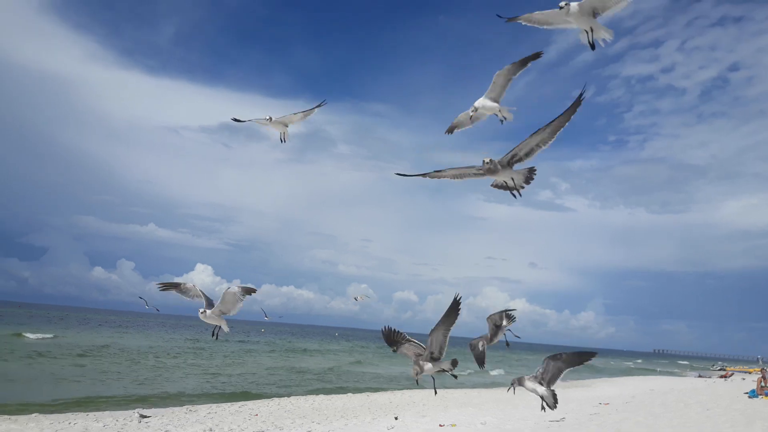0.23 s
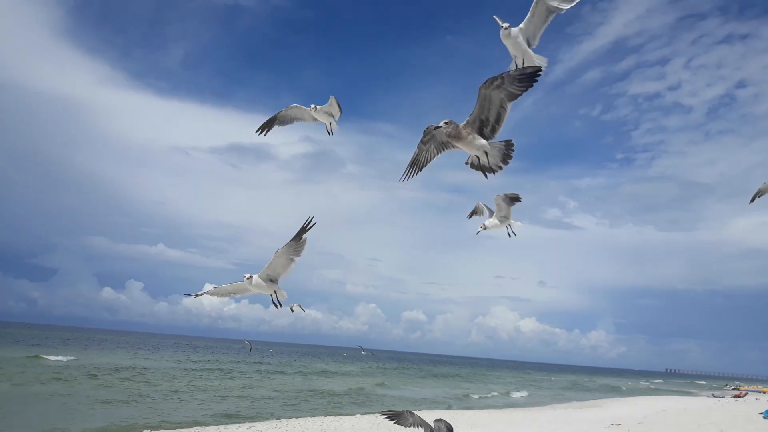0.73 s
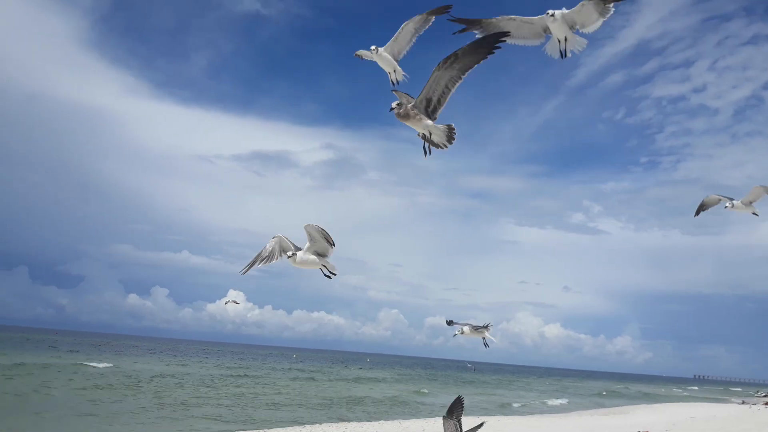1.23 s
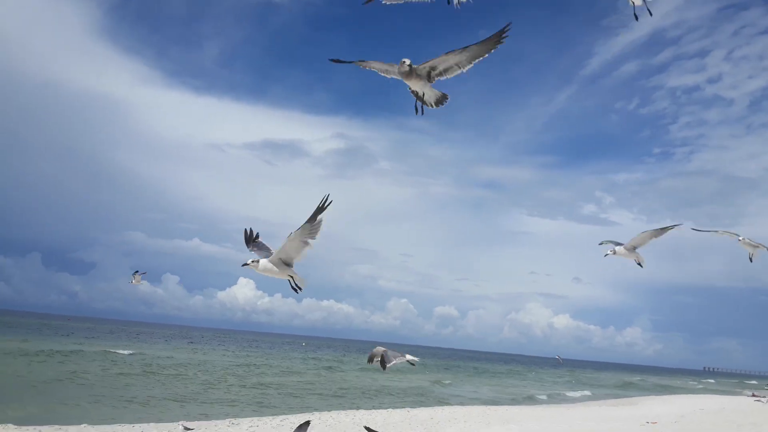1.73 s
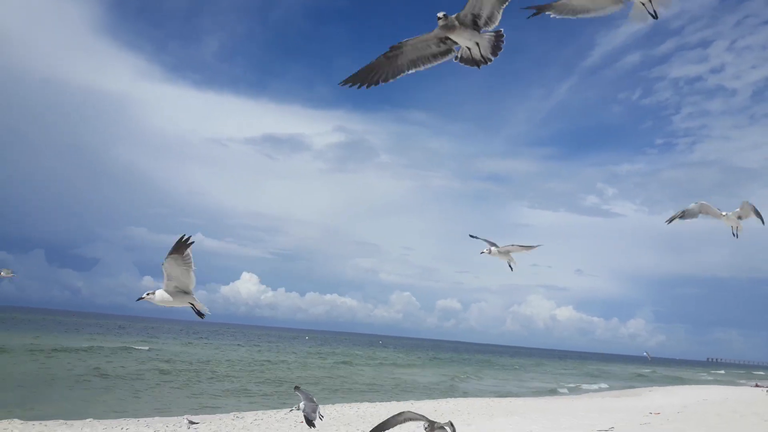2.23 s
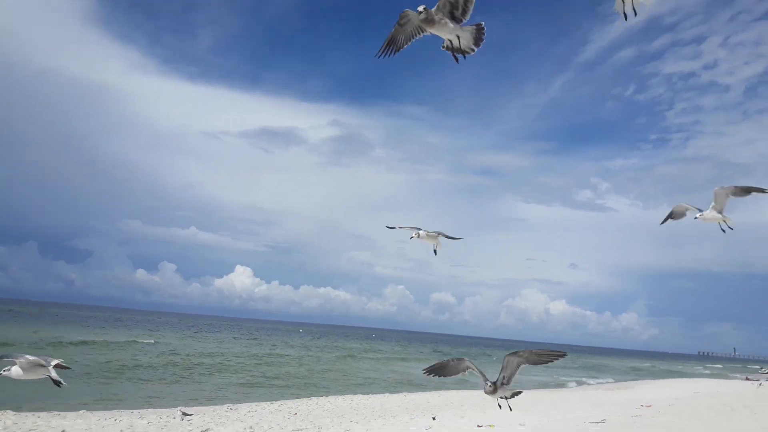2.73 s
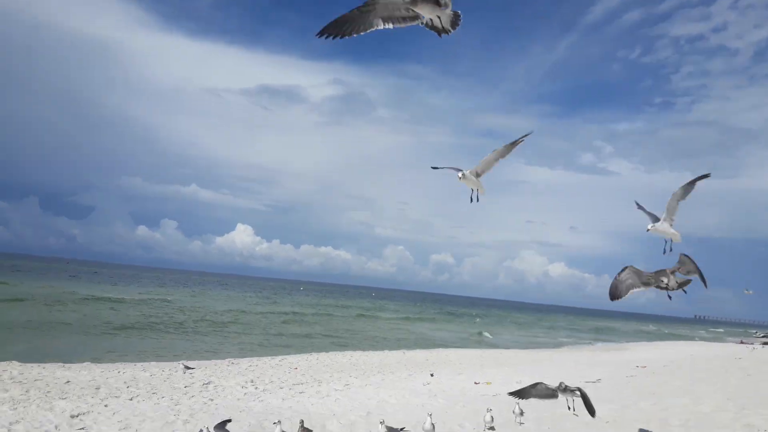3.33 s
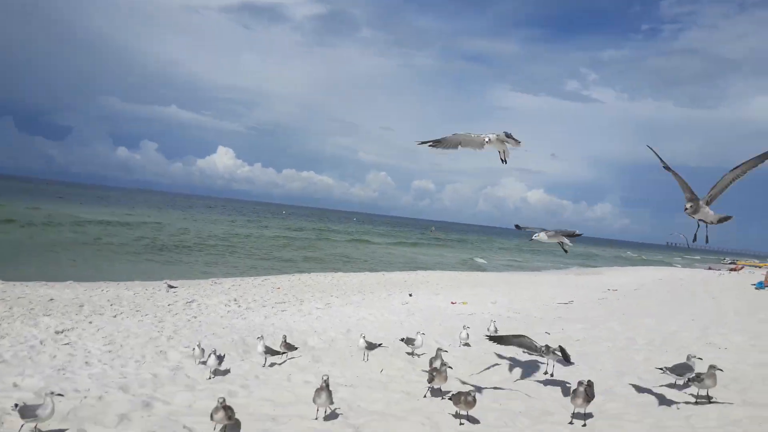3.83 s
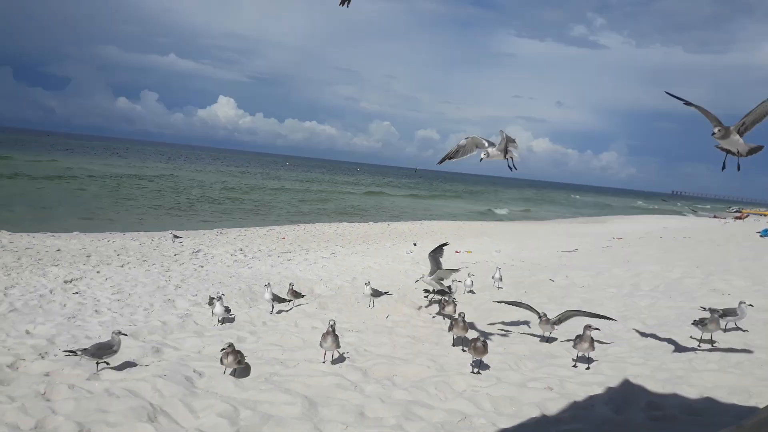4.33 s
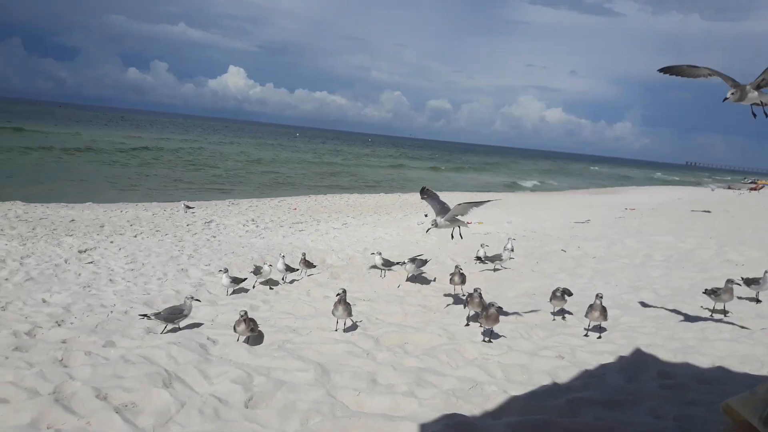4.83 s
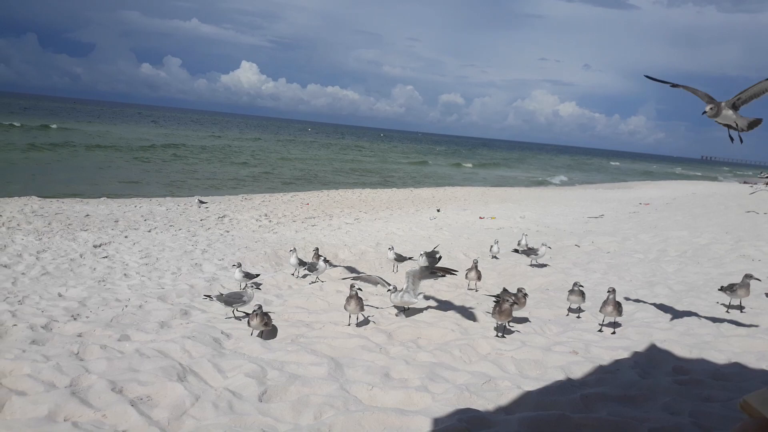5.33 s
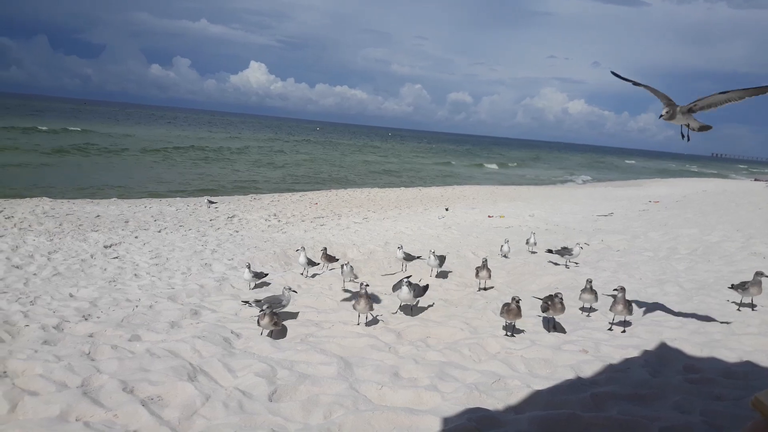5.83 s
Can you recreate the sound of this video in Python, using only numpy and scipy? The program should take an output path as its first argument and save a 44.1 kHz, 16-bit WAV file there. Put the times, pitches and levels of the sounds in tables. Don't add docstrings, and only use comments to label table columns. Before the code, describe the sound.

Begging gull whistles and rasping squawks crowd together, thin out to a lull, then a scream, low chuckle and late cries above quiet surf.

```python
import sys
import numpy as np
from scipy import signal
from scipy.fft import rfft, irfft, next_fast_len
from scipy.io import wavfile
from scipy.ndimage import uniform_filter1d, map_coordinates

SR = 44100
rng = np.random.default_rng(int(sys.argv[2]) if len(sys.argv) > 2 else 0)


def transcribe(u):
    v = np.clip(np.atleast_2d(u).T, -1, 1)
    q = np.round(v * 32767).astype(np.int16)
    wavfile.write(sys.argv[1], SR, q)


def makeup_ratio(level_db):
    decades = np.asarray(level_db, float) / 20
    return 10 ** decades


N = 267554
TIME_S = np.arange(N) / SR
PORTS = np.array([[.5], [-.5]])


def unit(x):
    return x / np.sqrt(np.mean(x ** 2) + 1e-20)


def along(points, hz):
    f, v = np.transpose(points)
    return np.interp(np.log(hz + 1), np.log(f + 1), v)


def wobble(rate_hz, size=N):
    knots = rng.standard_normal(int(size * rate_hz / SR) + 4)
    return map_coordinates(knots, [np.arange(size) * rate_hz / SR])


def filtered(x, response):
    m = next_fast_len(x.shape[-1] + 2048)
    spectrum = rfft(x, m) * response(np.fft.rfftfreq(m, 1 / SR))
    return irfft(spectrum, m)[..., :x.shape[-1]]


def at_ports(x, pan_db, shading, lead_ms):
    def response(hz):
        level = makeup_ratio(PORTS * (pan_db + along(shading, hz)))
        return level * np.exp(2j * np.pi * hz * PORTS * lead_ms / 1000)
    return filtered(x, response)


def stretch(rows, fade_s):
    s, *cols = np.transpose(rows)
    t = np.arange(s[0], s[-1], 1 / SR)
    edge = np.clip(np.minimum(t - s[0], s[-1] - t) / fade_s, 0, 1)
    curves = [np.interp(t, s, c) for c in cols]
    return round(s[0] * SR), curves, np.sin(np.pi / 2 * edge) ** 2


# freq_hz, correlation
SURF_LIKENESS = [(250, 0.99), (650, 0.51), (1300, 0.95), (2200, 0.78), (3000, 0.05), (3900, 0.31),
                 (5200, 0.19), (6900, 0.15), (8000, 0.093)]
# freq_hz, left_right_db
SURF_SHADING = [(200, 0.3), (1300, -3), (2500, -1), (4400, -3.5), (8000, -3.5), (12000, 3.5)]


def surf_noise(spectrum, patchy_db):
    z = signal.stft(rng.standard_normal((2, N)), nperseg=512)[2]
    field = rng.standard_normal(z.shape[1:])
    field = uniform_filter1d(uniform_filter1d(field, 6, 0), 14, 1)
    pair = signal.istft(z * makeup_ratio(patchy_db * unit(field)), nperseg=512)[1][:, :N]

    def mid_side(hz):
        turn = np.arccos(np.clip(along(SURF_LIKENESS, hz), -1, 1)) / 2
        return makeup_ratio(along(spectrum, hz)) * [np.cos(turn), np.sin(turn)]
    mid, side = filtered(pair, mid_side)
    return unit(at_ports(np.array([mid + side, mid - side]), 0, SURF_SHADING, lead_ms=0.421))


# freq_hz, density_db
RUSH_SPECTRUM = [(100, -29), (220, 0.5), (500, -4), (1200, 0), (2100, 0), (2700, -7.5), (4000, -7),
                 (6200, -13), (7200, -10), (8700, -28), (10000, -28)]
# freq_hz, density_db
SPRAY_SPECTRUM = [(7000, -35), (9500, -8.5), (12200, 2.5), (14000, -1), (16000, -2)]
# freq_hz, density_db
RUMBLE_SPECTRUM = [(25, -34), (60, -3.5), (110, 4), (250, -2), (400, -29)]
# start_s, rumble_level_db
BREEZE_LEVEL = [(.08, -51), (1.1, -58.5), (1.5, -59.5), (2.55, -59.5), (2.7, -50.5), (3.5, -45), (4.5, -45),
                (5.2, -44), (6.07, -47)]


def surf():
    rumble_db = np.interp(TIME_S, *np.transpose(BREEZE_LEVEL))
    breeze_db, swell = rumble_db + 50, wobble(2.9)
    rush_db = -35 + 0.11 * breeze_db + 0.48 * swell + 0.46 * wobble(11)
    rumble_db = rumble_db + 1.0 + 0.13 * swell + 1.7 * wobble(7.9)
    spray_db = -52.5 - 0.027 * breeze_db + 0.23 * wobble(5.9)
    rush = makeup_ratio(rush_db) * surf_noise(RUSH_SPECTRUM, patchy_db=1.2)
    rumble = makeup_ratio(rumble_db) * surf_noise(RUMBLE_SPECTRUM, patchy_db=-0.5)
    return rush + rumble + makeup_ratio(spray_db) * surf_noise(SPRAY_SPECTRUM, patchy_db=3.5)


# start_s, level_db, left_right_db
GUST_CURVES = [
    [(0.08, -36, 10), (0.122, -28.5, 3), (.55, -31.5, 4.5), (0.968, -40.5, 8), (1.2, -50, 0)],
    [(2.6, -46, 7), (2.758, -43, 15), (3.45, -44, 3)],
]
# freq_hz, density_db
BUFFET_SPECTRUM = [(25, -39), (60, -3), (170, 1.5), (300, -8), (550, -21), (900, -29), (1500, -72)]
# centre_s, spread_s, level_db, left_right_db
EDDY_THUMPS = [(.145, 0.019, -20.5, 11), (.18, 0.0099, -31, -2), (0.253, 0.015, -23, 14.5),
               (.44, 0.04, -30.5, 10), (.505, 0.0058, -31, -5), (.538, 0.014, -33.5, -13),
               (2.752, 0.0044, -29.5, 11), (2.83, 0.011, -41, 7), (2.93, 0.01, -33, 15.5),
               (2.976, 0.012, -35.5, 15), (3.01, 0.008, -33, 6), (3.111, 0.0068, -35, 8),
               (3.132, 0.0085, -36, 5), (3.165, 0.0069, -42, 19), (3.3, 0.013, -29.5, -13)]


def gusts():
    gain, thump = np.zeros((2, N)), np.zeros((2, N))
    for rows in GUST_CURVES:
        first, (level_db, pan_db), edge = stretch(rows, fade_s=0.0016)
        gain[:, first:first + len(edge)] = makeup_ratio(level_db - 4 + PORTS * pan_db) * edge
    for centre_s, spread_s, level_db, pan_db in EDDY_THUMPS:
        thump += makeup_ratio(level_db + PORTS * pan_db) * np.exp(-.5 * ((TIME_S - centre_s) / spread_s) ** 2)

    def colour(hz):
        return makeup_ratio(along(BUFFET_SPECTRUM, hz))
    lumps = makeup_ratio(3.0 * np.array([wobble(40.22), wobble(35)]))
    buffet = unit(filtered(lumps * rng.standard_normal((2, N)), colour))
    eddy = filtered(rng.standard_normal((2, N)), colour)
    even = eddy / np.sqrt(np.abs(uniform_filter1d(eddy ** 2, size=900, axis=1)) + 1e-9)
    return gain * buffet + thump * even


# start_s, peak_db
CLICK_TICKS = [(1.1144, -29), (2.222, -32), (4.2536, -36), (5.007, -27.5), (5.02, -29), (5.031, -31),
               (5.446, -25)]


def ticks():
    out, t = np.zeros((2, N)), np.arange(600) / SR
    puff = np.exp(-.5 * ((t - .003) / 0.0023) ** 2)
    for start_s, peak_db in CLICK_TICKS:
        burst = puff * rng.standard_normal((2, len(t)))
        out[:, round(start_s * SR):][:, :len(t)] += makeup_ratio(peak_db + 3.5) * burst * makeup_ratio(PORTS * 5)
    colour_db = [(2000, -24), (6500, -0.5), (9000, -18.5), (12500, -3.5)]
    return filtered(out, lambda hz: makeup_ratio(along(colour_db, hz)))


SAND_SQUAWK_DB = -4
# freq_hz, left_right_db
VOICE_SHADING = [(1200, 0.5), (2100, 4.5), (3300, -0.8), (8000, 0), (9500, -2), (13000, 5)]


def add(out, first, x, pan_db, lead_ms, echo_db, swing=(0, 0)):
    before = 32
    x = at_ports(np.pad(x, (before, 600)), pan_db, VOICE_SHADING, lead_ms)
    i = np.arange(x.shape[1])
    delay_ms = 5 + 1.2 * rng.standard_normal((2, 1))
    drift_ms_per_s = 3.5 * rng.standard_normal((2, 1))
    late_ms = delay_ms + drift_ms_per_s * (i - i.mean()) / SR
    echo = np.array([map_coordinates(port, [i - ms * SR / 1000]) for port, ms in zip(x, late_ms)])
    x = (x + makeup_ratio(echo_db) * echo) / np.sqrt(1 + makeup_ratio(2 * echo_db))
    swing_db, swing_ms = swing
    way = np.linspace(-.5, .5, x.shape[1])
    left = makeup_ratio(swing_db * way) * map_coordinates(x[0], [i + swing_ms * way * SR / 1000])
    room = out[:, first - before:first - before + x.shape[1]]
    room += np.array([left, x[1]])[:, :room.shape[1]]


def note(start_s, length_s, first_hz, last_hz, level_db, slide):
    peak_s = start_s + 0.453 * length_s
    peak_hz = first_hz + slide * (last_hz - first_hz)
    return [(start_s, first_hz, level_db - 3), (peak_s, peak_hz, level_db),
            (start_s + length_s, last_hz, level_db - 3.5)]


def whistle(out, rows, pan_db, lead_ms, flutter_db, thinning, multiples, swing=(0, 0)):
    first, (pitch, level_db), edge = stretch(rows, fade_s=0.0058)
    n = len(pitch)
    bright_db = thinning * (level_db.max() - level_db)
    trill_hz = 27 * (1 + .2 * wobble(10, size=n))
    beat = 2 * np.pi * (rng.random() + np.cumsum(trill_hz) / SR)
    pitch = pitch * (1 + .0012 * flutter_db * np.sin(beat))
    level_db = level_db - .6 * max(flutter_db - 1, 0) * (np.cos(beat / 2) ** 6 - .3)
    waver = 1 + 0.0021 * flutter_db * wobble(58.8, size=n)
    turn = 2 * np.pi * np.cumsum(pitch * waver) / SR
    tone = np.sin(turn) * makeup_ratio(1.45 * flutter_db * np.minimum(wobble(109.0, size=n), .4))
    for k, db in enumerate(multiples):
        break_db = 1.97 * flutter_db * np.minimum(wobble(81.6, size=n), .4)
        tone = tone + makeup_ratio(db + (k + 1) * bright_db + break_db) * np.sin((k + 2) * turn + k)
    roughness = 1 + 0.091 * flutter_db * wobble(353, size=n)
    voice = np.sqrt(2) * makeup_ratio(level_db) * edge * tone * roughness
    echo_db = min(-20 + 3.5 * flutter_db, SAND_SQUAWK_DB)
    add(out, first, voice, pan_db, lead_ms, echo_db, swing)


# start_s, pitch_hz, level_db
BEGGING_CRY = [(.08, 3360, -34), (.13, 3630, -28), (.155, 3520, -28), (.19, 3730, -29.5),
               (.21, 3560, -31.5), (.232, 3670, -27), (.246, 3600, -29)]
PLEADING_CRY = [(.244, 3515, -25), (.262, 3600, -32), (.283, 3555, -25), (.305, 3540, -28),
                (.326, 3488, -23), (.34, 3575, -25), (.37, 3545, -25), (.388, 3500, -27)]
SOBBING_CRY = [(.382, 3500, -27), (.396, 3462, -19), (.418, 3430, -19.5), (.43, 3315, -27),
               (.45, 3250, -32), (.472, 3330, -30), (.49, 3080, -30), (.505, 2800, -30), (.52, 2700, -32)]
YELPING_CRY = [(1.311, 1126, -45), (1.318, 1122, -42), (1.328, 1120, -44), (1.34, 1152, -47),
               (1.35, 1140, -48), (1.359, 1120, -42), (1.368, 1118, -44), (1.378, 1114, -47),
               (1.397, 1105, -52)]
ARCHING_CRY = [(1.935, 2056, -29), (1.965, 2210, -27), (2.01, 2300, -25.5), (2.043, 2440, -37),
               (2.065, 2460, -53), (2.13, 2310, -50), (2.15, 2380, -64), (2.18, 2260, -52),
               (2.215, 2250, -61)]
ANSWERING_CRY = [(2.042, 3180, -28.5), (2.1, 3030, -33.5), (2.14, 2880, -38), (2.18, 2920, -39),
                 (2.215, 2780, -45), (2.235, 2640, -52)]
SCREAMING_CRY = [(3.122, 4100, -31), (3.133, 4010, -19), (3.16, 4040, -18.5), (3.176, 4135, -27),
                 (3.21, 4184, -27), (3.254, 4130, -28), (3.314, 4102, -35), (3.338, 4085, -45)]
DIPPING_CRY = [(5.437, 2335, -34), (5.45, 2310, -29), (5.475, 2290, -28.5), (5.5, 2320, -30.5),
               (5.515, 2360, -33), (5.53, 2370, -46)]
RISING_CRY = [(5.51, 3530, -24), (5.58, 3570, -28), (5.61, 3700, -33.5), (5.64, 3850, -35),
              (5.67, 3890, -38), (5.7, 3890, -46)]
PASSING_CRY = [(5.925, 4700, -31), (5.95, 4775, -20.5), (5.99, 4775, -19.5), (6.02, 4745, -21.5),
               (6.045, 4705, -27), (6.066, 4720, -22)]
# start_s, length_s, first_hz, last_hz, level_db
HIGH_LEFT_NOTES = [(1.05, 0.091, 3070, 3120, -31.5), (1.2, 0.026, 3130, 3040, -24),
                   (1.254, 0.036, 3190, 3220, -23.5), (1.288, 0.027, 3140, 2750, -21)]
HIGH_RIGHT_NOTES = [(.545, 0.049, 3340, 3150, -27.5), (.605, 0.016, 3240, 3200, -23),
                    (1.11, .085, 3280, 3340, -32.5), (1.19, 0.032, 3360, 3440, -26),
                    (1.228, .04, 3200, 2830, -27), (1.345, .035, 3130, 2630, -27.5),
                    (1.39, 0.0364, 2990, 2700, -33), (1.458, .026, 3100, 3100, -36),
                    (1.522, 0.033, 3570, 3280, -25.5), (5.418, .026, 3380, 3470, -32.5)]
LOW_LEFT_NOTES = [(.21, .04, 2120, 2350, -35), (1.368, 0.027, 1957, 2100, -21.5),
                  (1.402, 0.021, 1950, 1860, -32.5), (1.426, 0.032, 1900, 1865, -31),
                  (1.455, 0.034, 2050, 2290, -32), (1.553, 0.02, 2240, 2176, -26.5),
                  (1.643, .05, 2200, 2180, -36.5), (2.4, 0.023, 2126, 2180, -31)]
LOW_MIDDLE_NOTES = [(.33, .034, 2100, 2260, -23), (.415, 0.047, 2400, 2070, -28.5),
                    (.475, .018, 1750, 1800, -29), (1.1, .035, 2510, 2430, -33),
                    (1.135, .025, 2440, 2440, -35), (1.208, .03, 2050, 2220, -31),
                    (1.312, .03, 1944, 2016, -22.5), (5.82, 0.036, 1904, 2060, -24.5),
                    (5.854, 0.018, 2400, 2460, -24)]
LOW_BRIGHT_NOTES = [(1.284, 0.033, 2150, 2400, -31), (1.236, .024, 2300, 2430, -31)]
LOW_RIGHT_NOTES = [(1.258, 0.03, 1990, 2080, -24.5), (1.58, 0.041, 2440, 2450, -37)]
SQUEAK_NOTES = [(.225, 0.031, 6020, 6440, -33), (.24, .022, 5080, 5230, -33), (.43, 0.042, 4090, 4050, -32),
                (.478, 0.054, 4060, 4020, -24), (.44, 0.06, 4570, 4700, -31.5),
                (.518, .026, 4580, 4750, -21), (.626, 0.016, 3550, 3550, -26), (.66, .022, 6900, 7360, -35),
                (1.005, .045, 1467, 1546, -36.5), (1.028, .02, 4000, 4020, -39),
                (1.055, .03, 5000, 5270, -40.5), (1.213, .025, 4360, 4100, -35),
                (1.235, 0.02, 4700, 4700, -37), (1.449, 0.012, 3360, 3600, -30),
                (1.555, 0.022, 4430, 4400, -30), (1.615, 0.011, 3600, 3600, -30),
                (.548, .034, 6350, 5900, -33), (.645, .032, 4500, 4880, -30), (1.195, .03, 5150, 5210, -39),
                (1.22, .02, 6680, 6480, -35), (1.321, .024, 3450, 3540, -29),
                (1.328, .016, 5820, 5860, -35), (1.36, .018, 3480, 3390, -33),
                (1.394, .014, 7200, 7200, -35), (3.07, .026, 2950, 3030, -34),
                (3.088, .034, 4170, 4125, -26), (5.834, .028, 5650, 5750, -30),
                (5.508, .02, 5830, 5790, -33.5), (5.8, .024, 6700, 6800, -39.5)]
# start_s, length_s, first_hz, last_hz, level_db
WAIL_SYLLABLES = [(.255, 0.036, 1340, 1435, -36), (.286, 0.022, 1334, 1330, -30.5),
                  (.306, 0.036, 1335, 1325, -31), (.348, 0.034, 1330, 1310, -34),
                  (.386, 0.032, 1314, 1300, -37), (.424, .024, 1325, 1322, -36),
                  (.45, 0.1, 1348, 1336, -40), (.545, .045, 1306, 1280, -44)]
WARBLE_SYLLABLES = [(.518, 0.048, 2284, 2450, -25), (.572, 0.038, 2390, 2380, -24.5),
                    (.615, 0.018, 2300, 2310, -22.5), (.636, .018, 2305, 2305, -20),
                    (.657, 0.053, 2260, 2250, -28)]


def whistles():
    out = np.zeros((2, N))
    # notes, left_right_db, left_lead_ms, flutter_db, share of glide done at the peak, multiples 2.. in dB
    for rows, pan_db, lead_ms, flutter_db, slide, multiples in [
            (HIGH_LEFT_NOTES, 0.55, 0.794, 2.2, 0.2, (-7, -25)),
            (HIGH_RIGHT_NOTES, -1.8, -0.335, 2.2, 0.24, (-8, -26)),
            (LOW_LEFT_NOTES, -1.1, 0.44, 2, 0.38, (-12.5, -10)),
            (LOW_MIDDLE_NOTES, 0.54, 0.12, 2, .5, (-8, -10)),
            (LOW_RIGHT_NOTES, -.5, -0.394, 2, 0.155, (-12, -16)),
            (LOW_BRIGHT_NOTES, -.5, -.39, 1.8, .6, (-8, 1)),
            (SQUEAK_NOTES, .5, .01, 2, 0.49, ()),
            (WAIL_SYLLABLES, -6.5, -0.04, 1.9, 0.48, (12, 10.5, -8, -6, -9)),
            (WARBLE_SYLLABLES, 4, -0.042, 2.3, .45, (-10, -4))]:
        for row in rows:
            whistle(out, note(*row, slide), pan_db, lead_ms, flutter_db, 0, multiples)
    # (dB, ms)
    for cry in [
            (BEGGING_CRY, -8.5, -0.472, 1.7, -.3, (0.89, -34), (8, 0.025)),
            (PLEADING_CRY, -10.5, -0.456, 1.9, -0.1, (0, -36)),
            (SOBBING_CRY, -10.5, -0.456, 1.5, -0.3, (4, -36)),
            (ARCHING_CRY, 1.6, -0.428, 1.6, 0.33, (-31, -11)),
            (ANSWERING_CRY, 1.8, -0.426, 1.2, .05, (-7, -37, -30, -32)),
            (SCREAMING_CRY, -1.7, -0.521, 0.6, 0.44, (-22, -40)),
            (DIPPING_CRY, -4, 0.575, 1, 0.16, (11, -11.5)),
            (RISING_CRY, -9, 0.4, 0.97, -0.3, (-9, -32, -26)),
            (PASSING_CRY, -9, -0.521, 0.31, -.2, (-11.5, -21), (8, .045)),
            (YELPING_CRY, 4.5, 0.444, 1.4, -.5, (18, 11, 7, 19, 19, 12, -5))]:
        whistle(out, *cry)
    return out


def bark(start_s, attack_s, release_s, pitch_hz, level_db, rise, sag):
    u = np.linspace(-1, 1, 13)
    s = start_s + attack_s + u * np.where(u < 0, attack_s, release_s)
    glide = (s - start_s) / (attack_s + release_s) - .5
    slack = np.abs(u) ** 2.2
    pitch = pitch_hz * (1 + rise * glide - sag * slack)
    return np.transpose([s, pitch, level_db - np.where(u < 0, 12, 14) * slack])


# freq_hz, gain_db
THROAT_RESPONSE = [(300, -18), (1000, -12), (2100, 1.5), (2800, -1), (3500, 2), (4100, 3.5), (5000, -3.5),
                   (5800, -2), (7000, -2), (8000, -14), (8600, -33), (10200, -34), (12000, -25.5),
                   (15500, -28)]


def squawk(out, rows, pan_db, lead_ms, hoarse, bill_hz):
    first, (mean_hz, level_db), edge = stretch(rows, fade_s=0.002)
    n, hoarse = len(edge), np.clip(hoarse, 0, 1)
    jitter = hoarse * (.07 * wobble(40, size=n) + .05 * wobble(500, size=n))
    cycle = np.cumsum(mean_hz * (1 + jitter)) / SR
    k = np.arange(1, 32)
    audible = k[k * mean_hz.max() < 16000]
    flicker = makeup_ratio((1.6 + 2.2 * hoarse) * np.array([wobble(75, size=n) for _ in audible]))
    phase = .05 * audible ** 2 + .4 * rng.standard_normal(len(audible))
    snaps = (flicker * np.sin(2 * np.pi * np.outer(audible, cycle) + phase[:, None])).sum(0)
    breath = rng.standard_normal(n) * (0.44 + np.cos(np.pi * cycle) ** 4)
    drive = np.sqrt(1 - .4 * hoarse) * unit(snaps) + np.sqrt(.4 * hoarse) * unit(breath)
    near_db = 0.73 * (level_db.max() + 26)

    def colour(hz):
        bill_db = 7 / (1 + ((hz - bill_hz) / 500) ** 2)
        return makeup_ratio(along(THROAT_RESPONSE, hz) + bill_db + near_db * np.clip(hz / 4200 - 1, 0, 1.9))
    voice = unit(filtered(drive, colour))
    breaks_db = 1.8 * hoarse * np.clip(wobble(39.1, size=n), -1.5, .3)
    add(out, first, makeup_ratio(level_db + 1.5 + breaks_db) * edge * voice, pan_db, lead_ms, SAND_SQUAWK_DB)


# start_s, pitch_hz, level_db
LONG_RASP = [(.208, 499.8, -34), (.218, 540, -24.5), (.27, 560.3, -24), (.4, 536, -24), (.5, 541, -22),
             (.57, 534.7, -22.5), (.64, 525, -27), (.735, 427, -33.5), (.748, 407, -56)]
FAR_GRUMBLE = [(1.15, 500, -42), (1.19, 520, -35), (1.3, 505, -35), (1.33, 530, -32), (1.39, 515, -33),
               (1.43, 490, -40)]
# start_s, attack_s, release_s, pitch_hz, level_db
BARK_CALLS = [(1.005, 0.03, 0.032, 495, -36.5), (1.08, 0.03, 0.041, 510.6, -26),
              (1.432, .018, .022, 494, -28), (1.47, 0.0072, 0.046, 499, -26.5),
              (1.552, 0.013, 0.039, 530.2, -27), (1.612, 0.026, 0.05, 486.6, -29.5),
              (1.665, .03, .032, 493, -31.5)]
CROAK_CALLS = [(1.89, .028, 0.044, 550.4, -37), (2.355, 0.019, 0.021, 655, -35),
               (2.383, 0.028, 0.026, 714, -30.5), (2.42, .015, .012, 690, -35)]
CHUCKLE_CALLS = [(3.43, .025, .03, 480, -39), (3.465, .02, .03, 482, -36), (3.5, .018, .025, 510, -38),
                 (3.533, .025, .03, 514, -34), (3.568, .018, .025, 612, -35), (3.6, .015, .04, 602, -36),
                 (3.64, .02, .016, 525, -36), (3.664, .018, .02, 535, -35), (3.695, .025, .03, 523, -37),
                 (3.745, .018, .03, 510, -37)]
SHOUT_CALLS = [(3.052, .012, 0.038, 501.4, -29.5), (3.082, 0.018, 0.034, 518.5, -20),
               (3.128, 0.013, 0.014, 519.4, -34.5)]
SNAP_CALL = [(5.814, 0.0373, 0.019, 517.3, -19.5)]
CUT_OFF_CALL = [(.07, .02, .02, 1170, -37)]


def squawks():
    out = np.zeros((2, N))
    # calls, left_right_db, left_lead_ms, hoarseness, bill_hz, pitch rise over the call, sag at both ends
    for rows, *bird, rise, sag in [
            (BARK_CALLS, 0, 0.372, 0.41, 3550, 0.01, .01),
            (CROAK_CALLS, -.5, 0.4, 0.27, 5600, 0.01, .11),
            (CHUCKLE_CALLS, -3.5, 0.35, 0.27, 3700, 0.06, .01),
            (SHOUT_CALLS, -1.2, 0.241, 0.48, 4150, 0.01, .02),
            (SNAP_CALL, 0.36, -0.09, 0.55, 4200, 0.11, .02),
            (CUT_OFF_CALL, 2, 0.037, 0.063, 6900, .01, .01)]:
        for row in rows:
            squawk(out, bark(*row, rise, sag), *bird)
    squawk(out, LONG_RASP, pan_db=-2, lead_ms=0.1, hoarse=1.2, bill_hz=3700)
    squawk(out, FAR_GRUMBLE, pan_db=0, lead_ms=.17, hoarse=.8, bill_hz=5700)
    return out


def scene():
    return surf() + gusts() + ticks() + whistles() + squawks()


def top_cut(x):
    return signal.sosfilt(signal.butter(12, 15870, fs=SR, output="sos"), x)


def record(dry):
    held = dry / (1 + np.abs(dry / .9) ** 8) ** .125
    limited = filtered(held, lambda hz: hz < 15870)
    mix = limited * (TIME_S > .0795)
    return top_cut(mix)


dry = scene()
out = record(dry)
transcribe(out)
```